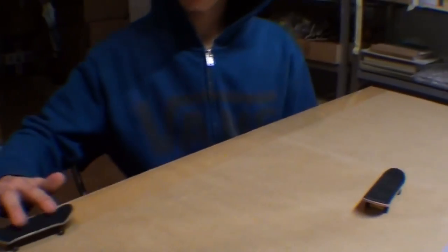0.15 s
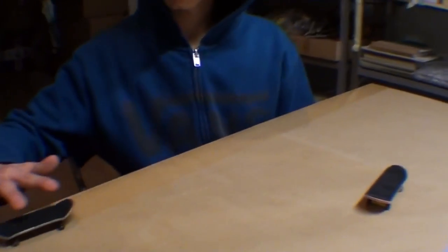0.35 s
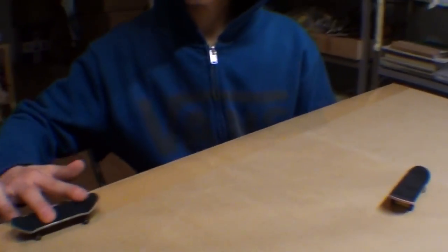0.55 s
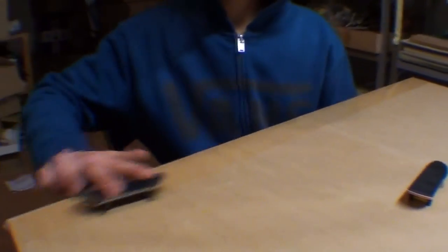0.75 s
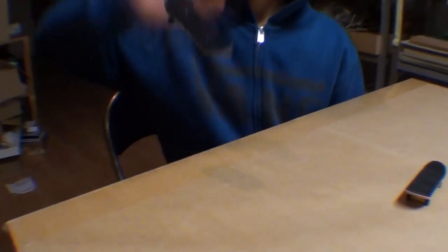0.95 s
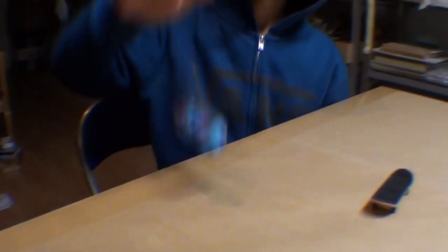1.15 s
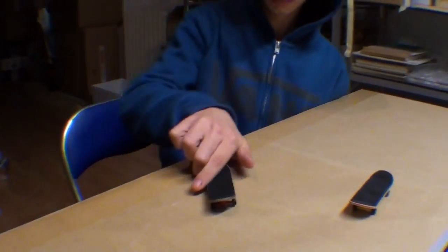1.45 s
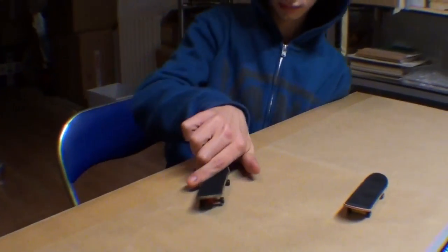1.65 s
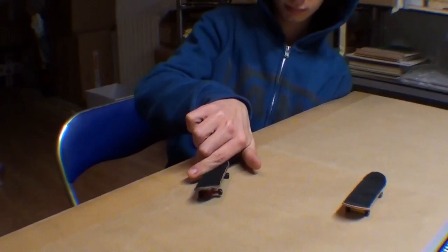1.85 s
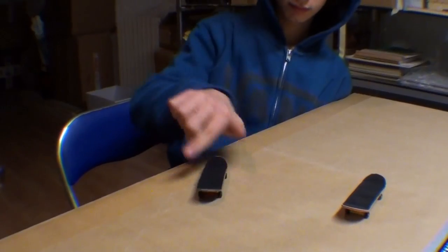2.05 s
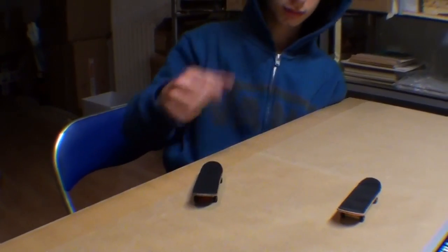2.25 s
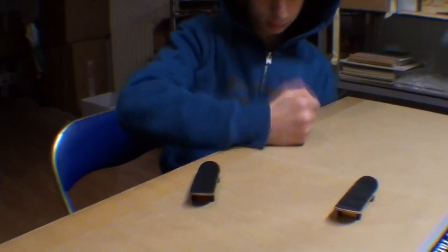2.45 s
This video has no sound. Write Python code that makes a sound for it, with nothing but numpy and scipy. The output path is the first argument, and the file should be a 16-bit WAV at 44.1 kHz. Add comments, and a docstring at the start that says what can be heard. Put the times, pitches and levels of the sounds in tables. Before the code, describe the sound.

A tiny toy skateboard taps and scuffs on a wooden table, pops sharply, lands with a loud rattling clack, then after a quiet pause a fist thumps the tabletop; close stereo microphones, small lively room, steady hiss.

```python
"""Toy skateboard on a wooden table

Heard close, on two microphones in a small lively room: a toy skateboard is rolled, flicked and
landed on a wooden table, and a fist thumps the table at the end. Each blow rings deck and table as
dying sines with a noisy crack; dense small knocks make the wheels' rumble and the rattle; shaped noise
makes a sleeve's rustle and steady hiss. The recorder's limiter holds the loud blows down."""
import sys
import numpy as np
from scipy import signal
from scipy.fft import rfft, irfft
from scipy.io import wavfile
from scipy.ndimage import uniform_filter1d, minimum_filter1d

SR = 44100
rng = np.random.default_rng(int(sys.argv[2]) if len(sys.argv) > 2 else 0)


def unload_wav(signal):
    """Save mono or channel-first audio to the path in sys.argv[1] as 16-bit WAV at rate SR, clipped to [-1, 1]."""
    wavfile.write(
        sys.argv[1],
        SR,
        np.round(np.clip(np.atleast_2d(signal).T, -1, 1) * 32767).astype(np.int16),
    )


N = 114660  # samples, 2.6 s

# Steady room tone and hiss: pitch_hz, relative level_db per Hz
FLOOR_SPECTRUM = [(12, -33), (20, -9.5), (277, -6.5), (328, -11.5), (542, -6), (759, -18), (897, -12.5),
                  (1290, -8.5), (1480, -11.5), (3440, -12), (16000, -22)]
FLOOR_DB = -54.5
# Stereo width of the hiss: pitch_hz, side minus mid level_db
FLOOR_WIDTH = [(60, -32), (180, -10.5), (550, -2), (1650, -4.5), (4970, -7.5), (15000, -25)]

# Wheels rolling and scuffing, one list per stretch: start_s, level_db
ROLL_LEVELS = [
    [(0, -53), (.09, -59.5), (.16, -70), (.3, -73)],
    [(.42, -56), (.44, -43.5), (.47, -50), (.52, -54.5)],
    [(.7, -68.5), (.76, -61), (.81, -44.5), (.85, -36), (.87, -40.5), (.885, -83)],
]
ROLL_KNOCKS_PER_S = 5000
ROLL_DECK_DB, ROLL_TABLE_DB, ROLL_GRIT_DB = -2.5, 4.5, -2.5
ROLL_DECK_KHZ, ROLL_TABLE_KHZ = 0.67, 0.25

# Dying away of the room: pitch_hz, t60_s
ROOM_DECAY = [(60, 0.12), (250, 0.36), (700, 0.38), (2000, 0.57), (5000, 0.36), (10000, 0.14)]
# Tone of the room's tail: pitch_hz, relative level_db
ROOM_COLOUR = [(60, -14.5), (250, 11), (700, -0.5), (2000, -8.5), (5000, 0), (10000, 17)]
# Stereo width of the tail, and the tilt of the near side signal: pitch_hz, side minus mid level_db
ROOM_WIDTH = [(60, -18), (180, -24), (550, -14), (1650, -8), (4970, -10), (15000, -13)]
ROOM_DB, ROOM_DELAY_S = -3.5, .006

# Blows: start_s, deck level_db, deck ring centre_khz, table level_db, table ring centre_khz, crack level_db
BLOW_EVENTS = [(.105, -38, 12, -66, 0.29, -68), (.168, -39.5, 4.2, -37, 0.55, -54),
               (.255, -70, 2.4, -44, 0.52, -70), (.399, -32, 0.96, -18, 0.62, -48),
               (.433, -50, 2.4, -30, 0.49, -58), (.440, -43, 0.93, -19.5, 0.6, -25),
               (0.448, -32.5, 1.24, -19, 0.56, -29), (.563, -34, 1.01, -26, 0.12, -32.5),
               (.650, -42, 1.25, -43, 0.45, -33), (0.794, -48, 1.46, -43, 0.27, -48),
               (.880, -24.5, 5.6, -50, 0.96, -18), (0.884, -18.5, 2.4, -6, 0.44, 2),
               (1.289, -5, 3.7, -22, 0.49, 5), (1.291, 8, 3.4, -9, 0.38, 4),
               (1.301, 5.5, 2.44, -0.5, 0.59, -10), (1.322, -0.5, 0.96, -4, 0.5, -19),
               (1.327, 4.5, 3.4, -18, .5, 1.5), (1.336, 4.5, .9, -9, 0.58, -2.5),
               (1.352, -20, 0.89, -10.5, 0.59, -27), (1.368, -5, 3.9, -23, 0.29, -8.5),
               (1.38, -14, 2.2, -16, 0.328, -30), (1.385, -72, 1, -31, 0.0774, -72),
               (1.67, -44.5, 0.89, -43.5, 0.98, -59), (1.700, -45.5, 0.83, -79, 0.39, -41),
               (1.903, -66, 0.33, -38, 0.22, -72), (2.102, -20.5, 1.026, -49, 0.68, -16.5),
               (2.119, -40, 4.8, -39, 0.12, -60), (2.155, -43, 3.9, -39.5, 0.54, -51),
               (2.301, -65, 1, -47.5, 0.34, -75), (2.364, -69, 0.82, -35.5, 0.49, -62),
               (2.534, -54, 1, -22.5, 0.27, -62), (2.544, -22, 6.5, -3.5, 0.61, 10),
               (2.5413, -13.5, 9.5, -27, 0.38, -22), (2.551, -16, 0.57, 8, 0.15, -19),
               (2.555, -11.5, 1.03, 4.5, 0.57, -5), (2.568, -9, 0.43, 0, 0.32, -18),
               (2.583, -2.5, 1.01, 1, 0.5, -28)]
# Ring of the little deck: pitch_hz, relative level_db, t60_s
DECK_MODES = [(885, 2, .028), (1510, 0, .026), (1880, -5, .012), (2220, 2, .05), (2600, -4, .012),
              (2920, -3, .014), (3300, -5, .011), (3650, -2, .016), (4200, -4, .018), (4700, -6, .01),
              (5200, -5, .012), (5900, -7, .009), (6800, -6, .012), (7600, -7, .009)]
# Ring of the table top: pitch_hz, relative level_db, t60_s
TABLE_MODES = [(51.3, -17, 0.3), (109.7, -26, 0.21), (168.6, -3, 0.051), (227, 1.5, .16), (321.5, 3, 0.056),
               (401.7, 6.5, 0.39), (460, 17, 0.043), (529, 8.5, 0.06), (622, 19.5, 0.025), (721.4, 7, 0.15),
               (1071, -24, 0.023)]
# Spectrum of the dry crack, and of grit and chatter: pitch_hz, level_db
CRACK_SPECTRUM = [(150, 0), (500, -3), (1200, 3), (2500, 3.5), (5000, -6.5), (7500, -18.5), (10000, -8.5),
                  (16000, -45.5)]
TABLE_PUSH_S = 0.00039  # time constant of the push into the table
SPOT_DB = 1.5  # mode strengths vary with the spot struck
DECK_OCTAVES, TABLE_OCTAVES = 0.68, 0.48  # reach of a blow: modes this far off centre lose 7.9 dB
CRACK_T60_S, CRACK_SNAP = .008, 4  # a sharp first snap, then grit
CRACK_TOP = 2.74  # the crack dulls above this multiple of the deck centre, 20 kHz at most

# Chatter of loose parts, one list per burst: start_s, level_db
RATTLE_LEVELS = [
    [(1.289, -17), (1.30, -9.5), (1.33, -11), (1.363, -20.5), (1.372, -33), (1.39, -25.5), (1.43, -29.5),
     (1.48, -39.5)],
    [(2.538, -39), (2.55, -13), (2.6, -47.5)],
]
RATTLE_KNOCKS_PER_S = 3500

# Cloth rustle, one list per movement: start_s, level_db
SLEEVE_LEVELS = [
    [(1.5, -51.5), (1.62, -55.5), (1.87, -58), (2.08, -74)],
    [(2.26, -81), (2.33, -60), (2.43, -53), (2.5, -77)],
]
# Spectrum of the cloth: pitch_hz, relative level_db per Hz
CLOTH_SPECTRUM = [(180, -37), (300, -32), (523, -20), (669, -3.5), (857, -1), (1110, -9), (1170, -8),
                  (6470, -5), (12000, -12), (15600, -53), (22000, -120)]

# Response of both microphones: pitch_hz, level_db
MIC_RESPONSE = [(20, -30.5), (60, -4.5), (150, -5), (300, 2), (6000, 5), (8000, 0.5), (10000, -16.5),
                (16000, -23)]
NEAR_SIDE_DB = -4  # the two microphones differ a little on near sounds

CEILING_DB, SQUEEZE = -5.5, .92  # the limiter takes off this share of the dB above its ceiling
EXCESS_FALL_DB_PER_S = 583  # fall of the held excess, before the squeeze
EDGE_HZ = 15900


def amp(db):
    """Decibels to a gain."""
    return 10 ** (np.asarray(db) / 20)


def evened(x):
    """Scales a signal to an RMS of 1."""
    return x / np.sqrt(np.mean(x ** 2) + 1e-20)


def read(points, hz):
    """Reads a table between its points, along log frequency."""
    f, value = np.transpose(points)
    return np.interp(np.log(hz + 1), np.log(f + 1), value)


def add(mix, start_s, sound):
    """Lays a sound into the mix, cut at the end."""
    part = mix[round(start_s * SR):][:len(sound)]
    part += sound[:len(part)]


def colour(x, points):
    """Shapes a signal by a spectrum, leaving its phase alone."""
    gain = amp(read(points, np.fft.rfftfreq(len(x), 1 / SR)))
    return irfft(rfft(x) * gain, len(x))


def causal(x, points):
    """Minimum-phase colouring, so that a click gains no sound ahead of itself."""
    hz = abs(np.fft.fftfreq(4096, 1 / SR))
    log_gain = np.log(amp(read(points, hz)))
    taps = np.fft.ifft(np.exp(np.conj(signal.hilbert(log_gain)))).real
    return signal.oaconvolve(x, taps[:2048])[:len(x)]


def lowpass(x, hz):
    """Second-order roll-off above hz."""
    return signal.lfilter(*signal.butter(2, hz, fs=SR), x)


def level(curves):
    """Smoothed gain over time from level curves, silent outside them."""
    t = np.arange(N) / SR
    gains = []
    for curve in curves:
        start_s, level_db = np.transpose(curve)
        gains.append(amp(np.interp(t, start_s, level_db, left=-200, right=-200)))
    return uniform_filter1d(sum(gains), size=200)


def stereo(mid, side):
    """Left and right from mid and side."""
    return np.array([mid + side, mid - side])


def knocks(per_s):
    """Clicks of random time, size and sign."""
    return rng.standard_normal(N) * (rng.random(N) < per_s / SR)


def ring(modes, khz, octaves, spot):
    """Dying sines of one object, strongest around the reached centre, scaled by their summed power."""
    hz, db, t60 = np.transpose(modes)[:, :, None]
    t = np.arange(SR // 4) / SR
    distance = np.log2(hz / (1000 * khz)) / octaves
    gain = amp(db - 7.9 * distance ** 2 + SPOT_DB * spot[:len(modes), None])
    sines = gain * amp(-60 * t / t60) * np.sin(2 * np.pi * hz * t)
    sound = sines.sum(0) / np.sqrt((gain ** 2).sum())
    # little sound well below the centre
    return signal.lfilter(*signal.butter(2, 400 * khz, "high", fs=SR), sound)


def knocked_ring(clicks, modes, khz, octaves):
    """One object rung by every click of a train, at an RMS of 1."""
    return evened(signal.oaconvolve(clicks, ring(modes, khz, octaves, np.zeros(14)))[:N])


def hiss():
    """Steady room tone and hiss: shaped noise, separate for mid and side."""
    mid, side = (evened(colour(n, FLOOR_SPECTRUM)) for n in rng.standard_normal((2, N)))
    return amp(FLOOR_DB) * stereo(mid, colour(side, FLOOR_WIDTH))


def rolling():
    """Wood grain under the wheels: dense small knocks into deck and table, with grit."""
    grain = knocks(ROLL_KNOCKS_PER_S)
    deck = knocked_ring(grain, DECK_MODES, ROLL_DECK_KHZ, 1.44)
    table = knocked_ring(grain, TABLE_MODES, ROLL_TABLE_KHZ, 1.44)
    grit = evened(lowpass(causal(grain, CRACK_SPECTRUM), 3800))
    rumble = amp(ROLL_DECK_DB) * deck + amp(ROLL_TABLE_DB) * table + amp(ROLL_GRIT_DB) * grit
    return level(ROLL_LEVELS) * rumble


def room(x):
    """Sparse taps of random sign, each band dying at its own speed; a mid and a weaker side tail."""
    taps = np.zeros((2, SR))
    at = np.arange(0, SR - 20, 20) + rng.integers(0, 20, (2, SR // 20 - 1))
    np.put_along_axis(taps, at, rng.choice([-1., 1.], at.shape), 1)
    hz, t, bands = signal.stft(taps, SR, nperseg=256)
    decay_db = read(ROOM_COLOUR, hz)[:, None] - 60 * t / read(ROOM_DECAY, hz)[:, None]
    tail = signal.istft(bands * amp(decay_db), SR, nperseg=256)[1]
    tail = np.pad(tail / np.linalg.norm(tail[0]), ((0, 0), (round(ROOM_DELAY_S * SR), 0)))
    mid, side = signal.fftconvolve(x[None], tail, axes=1)[:, :N]
    return stereo(mid, colour(side, ROOM_WIDTH))


def blows():
    """Each blow: deck ring, softer-starting table ring and a dry crack."""
    out = np.zeros(N)
    t = np.arange(SR // 40) / SR
    push = np.exp(-t / TABLE_PUSH_S)
    push /= push.sum()
    spots = rng.standard_normal((len(BLOW_EVENTS), 2, 14))
    noises = rng.standard_normal((len(BLOW_EVENTS), len(t)))
    for event, (deck_spot, table_spot), noise in zip(BLOW_EVENTS, spots, noises):
        start_s, deck_db, deck_khz, table_db, table_khz, crack_db = event
        deck = ring(DECK_MODES, deck_khz, DECK_OCTAVES, deck_spot)
        table = signal.oaconvolve(ring(TABLE_MODES, table_khz, TABLE_OCTAVES, table_spot), push)
        grit = amp(-60 * t / CRACK_T60_S) * (noise + CRACK_SNAP * (t == 0))
        crack = causal(lowpass(grit, min(CRACK_TOP * deck_khz, 20) * 1000), CRACK_SPECTRUM)
        add(out, start_s, amp(deck_db) * deck)
        add(out, start_s, amp(table_db) * table)
        add(out, start_s, amp(crack_db) * crack)
    return out


def rattle():
    """Wheels and axles chatter around hard blows: short cracks that also ring deck and table."""
    chatter = knocks(RATTLE_KNOCKS_PER_S)
    deck = knocked_ring(chatter, DECK_MODES, 1.8, 3.3)
    table = knocked_ring(chatter, TABLE_MODES, .42, 3.3)
    cracks = evened(causal(chatter, CRACK_SPECTRUM))
    return level(RATTLE_LEVELS) * (cracks + amp(-13) * deck + amp(-12) * table)


def sleeve():
    """Soft rustle of cloth: shaped noise whose level wavers at random."""
    uneven = evened(uniform_filter1d(rng.standard_normal(N), size=500))
    cloth = evened(colour(rng.standard_normal(N), CLOTH_SPECTRUM))
    return level(SLEEVE_LEVELS) * amp(1.2 * uneven) * cloth


def scene():
    """Near sounds and their room tail, as both microphones hear them."""
    near = blows() + rolling() + rattle() + sleeve()
    # a quarter-turn of phase, opposite in the two ears, gives the near sounds width
    side = amp(NEAR_SIDE_DB) * signal.hilbert(colour(near, ROOM_WIDTH)).imag
    heard = stereo(near, side) + amp(ROOM_DB) * room(near)
    return np.array([causal(ear, MIC_RESPONSE) for ear in heard])


def record(dry):
    """A limiter ducks both channels around peaks and recovers steadily; hiss joins, then the band limit."""
    peak_db = 20 * np.log10(abs(dry).max(0) + 1e-9)
    fall = np.arange(N) * EXCESS_FALL_DB_PER_S / SR
    held_peak_db = np.maximum.accumulate(peak_db + fall) - fall
    over_db = np.maximum(held_peak_db - CEILING_DB, 0)
    # widened, then smoothed, so the gain is down by the time the peak comes
    widened_db = -minimum_filter1d(-over_db, size=61)
    held = dry / amp(SQUEEZE * uniform_filter1d(widened_db, size=61))
    band_limit = signal.firwin(511, EDGE_HZ, window=("kaiser", 9), fs=SR)
    return signal.oaconvolve(held + hiss(), band_limit[None], "same")


dry = scene()
out = record(dry)
unload_wav(out)
```